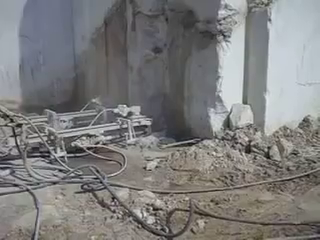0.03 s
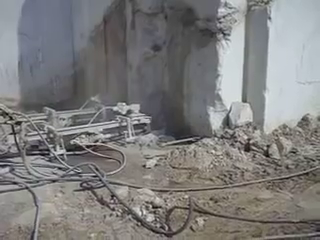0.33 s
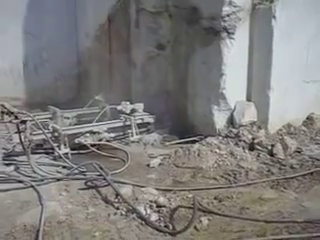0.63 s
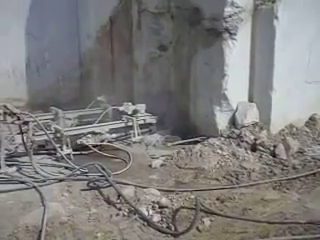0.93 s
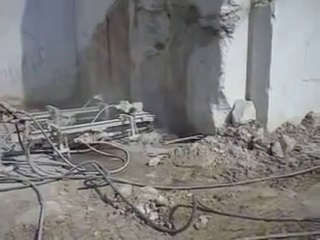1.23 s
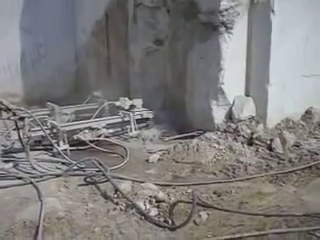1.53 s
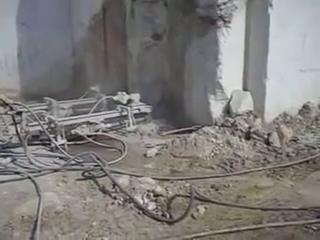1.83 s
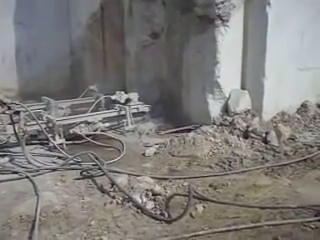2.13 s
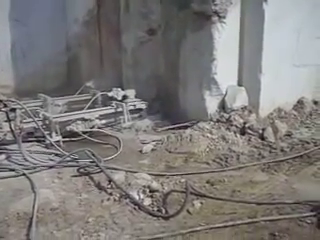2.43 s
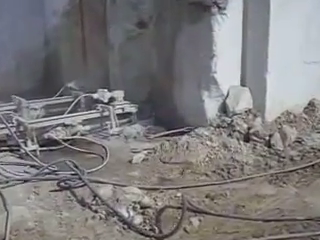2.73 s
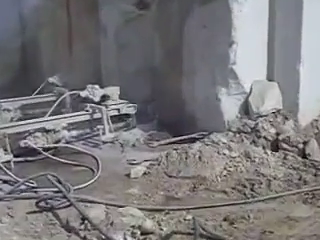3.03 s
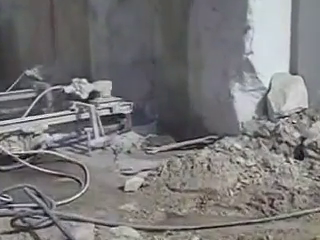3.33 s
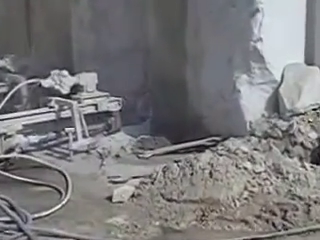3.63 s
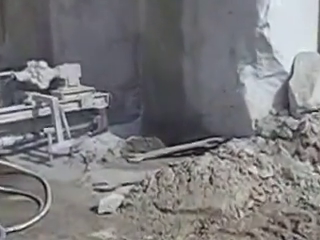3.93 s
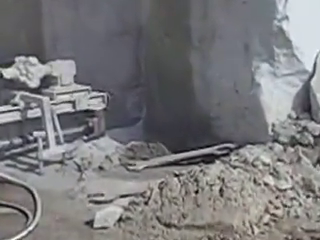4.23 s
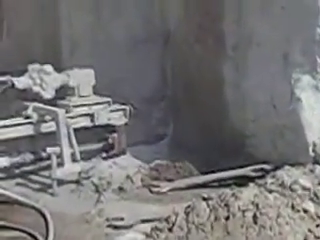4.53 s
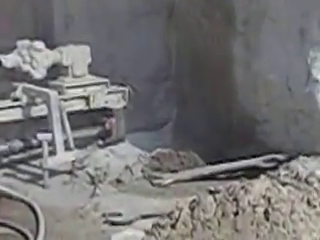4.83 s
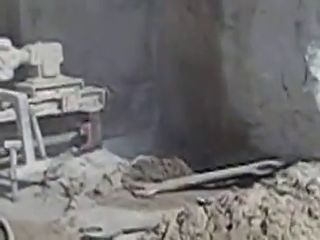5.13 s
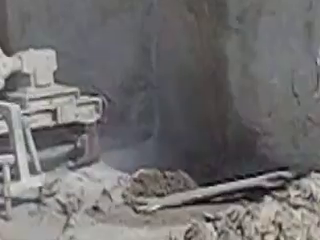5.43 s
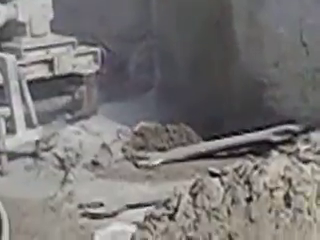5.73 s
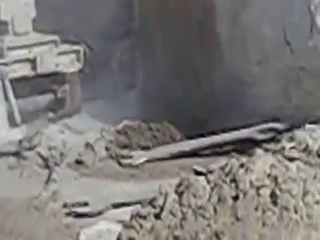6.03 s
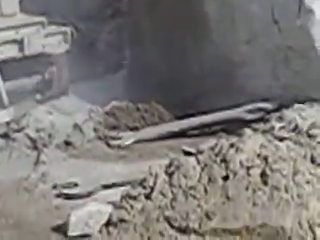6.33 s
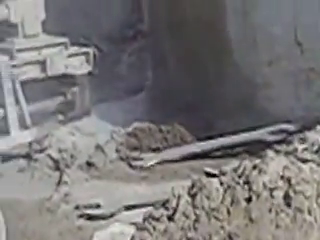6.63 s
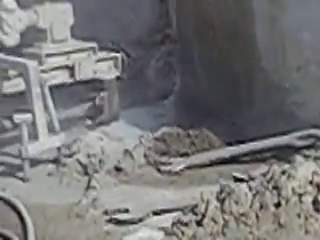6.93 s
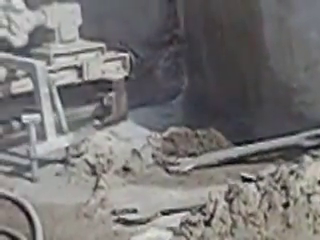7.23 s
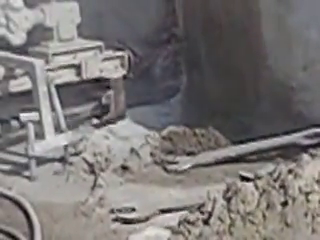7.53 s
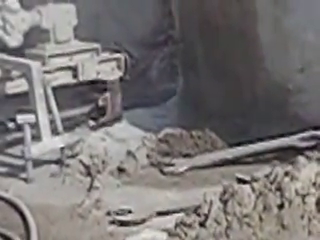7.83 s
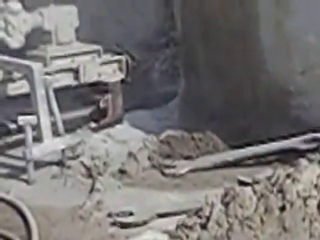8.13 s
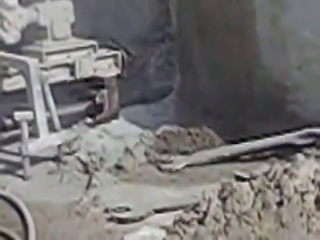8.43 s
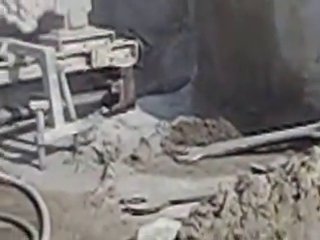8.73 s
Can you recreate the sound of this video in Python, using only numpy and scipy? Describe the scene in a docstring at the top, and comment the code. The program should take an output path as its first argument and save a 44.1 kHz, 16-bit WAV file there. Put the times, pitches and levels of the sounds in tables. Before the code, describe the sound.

A loud, dense roar of two air-powered drills pounding stone in a quarry, one close to the microphone and one farther off. It starts suddenly and never lets up: fast overlapping strokes, rushing air, rattling frames and a high metallic singing from the bits. Sharp exhaust cracks and irregular clanks stand out, with a quick run of ringing blows in the second half. Rock faces echo dully and the pit rumbles underneath.

```python
"""Two rock drills in a quarry

Two pneumatic drills hammer out of step, about 11.6 and 9.7 strokes a second; the sound begins abruptly with
both already in full work. Each stroke throws the piston on the drill steel and dumps puffs of spent air; some
blows bite and clank. Every blow sets off a fading rush of air and grit, so the roar surges as the drills drift
in and out of step. The stone walls echo, the pit rumbles, and the tallest cracks of the exhaust duck a limiter."""
import sys
import numpy as np
from scipy import signal
from scipy.fft import rfft, irfft, next_fast_len
from scipy.io import wavfile

SR = 44100
rng = np.random.default_rng(int(sys.argv[2]) if len(sys.argv) > 2 else 0)


def wrap_up_sound(samples):
    """Save the sound to the file named by the first command line argument, as 16-bit audio."""
    columns = np.atleast_2d(samples).T
    # keep every value between -1 and 1, then stretch to whole-number steps
    tamed = np.clip(columns, -1, 1)
    steps = np.round(tamed * 32767).astype(np.int16)
    wavfile.write(sys.argv[1], SR, steps)


N = 386757
TIME = np.arange(N) / SR
START_S = 0.606


# Stroke counters. Each row: time in seconds, strokes done.
NEAR_STROKE_COUNT = [(0.5195, 0), (0.7765, 3), (1.1213, 7), (1.4706, 11), (1.989, 17), (2.9413, 28),
                     (3.1158, 30), (3.8943, 39), (4.6687, 48), (5.2737, 55), (5.3368, 56), (5.7713, 61),
                     (6.8937, 74), (7.5004, 81), (7.7614, 84), (8.7991, 96)]
FAR_STROKE_COUNT = [(0.5104, 0), (1.2365, 7), (1.3449, 8), (1.9639, 14), (2.0726, 15), (2.2819, 17),
                    (3.2916, 27), (4.0833, 35), (4.5863, 40), (5.2071, 46), (5.3136, 47), (5.3989, 48),
                    (6.0669, 54), (6.4869, 58), (6.7885, 61), (7.0953, 64), (7.7974, 71), (8.2026, 75),
                    (8.8224, 81)]

def stroke_times(counter):
    """A drill cycles each time its counter passes a whole number."""
    times_s, done = np.transpose(counter)
    return np.interp(np.arange(done[-1] + 1), done, times_s)


# Puffs and wall slaps of one stroke. Each row: delay in seconds, ring in Hz, T60 in seconds,
# thud level in dB, spit level in dB.
NEAR_EXHAUST = [(0, 88, 0.06, -11, -20), (.0018, 300, 0.0045, -14, -17.5), (0.0252, 66, 0.071, -18, -22.5),
                (.0247, 261.7, 0.042, -15.5, -34.5), (.0362, 150, .035, -15.5, -45),
                (0.0372, 214, 0.084, -23.5, -31)]
FAR_EXHAUST = [(0, 194, 0.02, -13, -44), (0, 73.6, 0.049, -16, -46), (0.0343, 160, 0.017, -16.5, -51)]
# Rushing air. Each row: frequency in Hz, relative density in dB.
AIR_SPECTRUM = [(1500, -28), (2500, -10.5), (3800, -6), (4200, -5.5), (4700, -3), (5800, -1), (6700, -1),
                (7400, -4.5), (8100, -3), (8500, -6.5), (10200, -9), (10900, -20), (11700, -44.5),
                (12400, -53)]

def exhaust(strokes, puffs, uneven_db, lowpass_hz, spit_s):
    """Each port opens with a pressure step that rings down, and spits a little turbulent air."""
    t = TIME[:SR // 5]
    thuds = spits = 0
    for delay_s, hz, t60_s, thud_db, spit_db in puffs:
        train = clicks(strokes + delay_s, rng.normal(0, uneven_db, len(strokes)))
        thuds -= play(train, from_db(thud_db - 60 * t / t60_s) * np.cos(2 * np.pi * hz * t))
        spits += play(train, from_db(spit_db) * np.exp(-t / spit_s))
    turbulence = noise(AIR_SPECTRUM) + from_db(-5) * noise(FRAME_SPECTRUM)
    return lowpass(thuds, lowpass_hz, order=1) + spits * turbulence


def port_cracks(times_s, peak_db, fall_s, uneven_db):
    """A port snaps open with a needle-sharp pressure spike."""
    train = clicks(times_s, peak_db + uneven_db * rng.standard_normal(len(times_s)))
    needle = lowpass(np.exp(-TIME[:SR // 100] / fall_s), hz=9500, order=8)
    return -play(train, needle / needle.max())


# Each row: start in seconds, peak in dB.
ACCENT_CRACKS = [(1.146, -3), (1.237, -2), (1.494, -5), (1.582, -4), (1.989, -11), (2.513, -5),
                 (2.533, -16), (2.88, -3), (3.227, -4.5), (4.245, -4.5), (4.486, -10), (5.447, -2),
                 (6.172, -7), (6.486, -4), (6.918, -4.5), (7.352, -6), (7.5, 0), (8.651, -16)]

def second_port(times_s, peak_db, fall_s):
    """The near drill's second port cracks on every stroke, now and then far louder."""
    accent_s, accent_db = np.transpose(ACCENT_CRACKS)
    gap_to_accent_s = np.abs(times_s[:, None] - accent_s).min(axis=1)
    ordinary = port_cracks(times_s[gap_to_accent_s > 0.004], peak_db, fall_s, uneven_db=1.2)
    return ordinary + port_cracks(accent_s, accent_db, fall_s, uneven_db=0)


# How firmly each bit bears on the rock. Each row: time in seconds, near drill in dB, far drill in dB.
BIT_PRESSURE = [(0.6, 5.5, -7), (1.5, 0, -0.5), (2.4, 2, -2.5), (2.8, 1.5, -9), (3.8, -1, -1.5),
                (4.8, -0.5, -2.5), (5.7, 2.5, 3), (6.4, 3, -5), (7.3, -4.5, 4), (8.0, -0.5, -4.5),
                (8.77, 0.5, 1.5)]

def strikes(strokes, column, jitter_s, uneven_db):
    """The piston meets the steel just before the exhaust opens, as hard as the bit bears."""
    lead_s = 0.0208
    timing, strength = rng.standard_normal((len(strokes), 2)).T
    bite_db = curve(BIT_PRESSURE, strokes, column)
    return clicks(strokes - lead_s + jitter_s * timing, bite_db + uneven_db * strength)


# Drill frame. Each row: frequency in Hz, relative density in dB.
FRAME_SPECTRUM = [(200, -16), (460, -7), (680, -0.5), (880, -1), (1100, -2.5), (1450, -8.5), (2500, -7.5),
                  (5000, -53)]
# Each row: time in seconds, knock gain in dB.
KNOCK_GAIN = [(0.6, 0.5), (1.4, 2.5), (2.5, 1), (3.4, -4), (4.5, -1), (6.5, 1), (7.4, 0), (8.77, 4)]
# Drill steel. Each row: frequency in Hz, width in Hz, relative level in dB.
SHANK_MODES = [(1817, 17.7, -9.5), (1902, 140, -6.5), (2160, 160, -2)]
ROD_MODES = [(2831, 120, 3), (3406, 120, -1)]

def piston(hits, knock_db, clang_db, fall_s):
    """An ordinary blow knocks the frame, sets the rod pinging and clangs the steel."""
    force = play(hits, burst(rise_s=0.0012, fall_s=fall_s, tail_db=-11.5, tail_s=0.026))
    knock = from_db(knock_db + curve(KNOCK_GAIN)) * noise(FRAME_SPECTRUM)
    ping = from_db(clang_db - 6.5) * ringing(ROD_MODES)
    clang = shake(force * from_db(clang_db), SHANK_MODES + ROD_MODES)
    return force * (knock + ping) + clang


# Each row: start in seconds, then relative levels in dB of frame knock, shank clang, rod ping, bit sizzle.
HARD_BITES = [(1.006, -33, -32, -26, -22), (1.229, -38, -39, -36, -16), (1.533, -32, -40, -24, -17),
              (1.65, -17, -38, -36, -12), (1.968, -24, -31, -24, -26), (2.399, -25, -33, -28, -16),
              (2.483, -41, -40, -31, -18), (3.004, -21, -33, -34, -25), (2.768, -22, -28, -28, -27),
              (3.373, -25, -24, -26, -17), (3.672, -39, -41, -24, -26), (3.768, -32, -30, -30, -24),
              (4.367, -19.5, -40, -40, -22), (4.646, -18, -41, -21, -14), (4.671, -26, -38, -21, -27),
              (4.818, -24, -31, -24, -16), (4.874, -16, -23, -20, -8.5), (5.292, -17, -30, -22, -13),
              (5.598, -35, -19, -22, -15), (5.714, -41, -17.5, -19, -11), (5.824, -31, -19, -19, -18),
              (5.933, -22, -22, -21, -19), (6.048, -23.5, -21, -20, -18), (6.154, -34, -20.5, -28, -21),
              (6.264, -20, -26, -24, -14), (6.36, -15, -30, -18, -8), (6.785, -19, -41, -23, -17),
              (6.977, -41, -31, -22, -22), (7.074, -23, -28, -34, -16), (7.177, -24, -22, -24, -15),
              (7.279, -24, -32, -39, -12), (7.486, -33, -29, -41, -17), (7.911, -32, -42, -34, -29),
              (8.082, -29, -36, -29, -24), (8.49, -27, -23.5, -33, -22), (8.696, -19, -22, -24, -20)]
# Bit and chuck. Each row: frequency in Hz, width in Hz, relative level in dB.
BIT_MODES = [(4400, 52.8, 5.5), (4530, 41, 0), (4640, 19.7, 9.5), (4760, 63, 5), (4990, 38, 8.5),
             (5320, 78, 5.5), (5130, 180, -23), (6500, 67, -24), (8130, 110, -29)]

def clanks():
    """A hard bite knocks the frame, rings the shank and the long rod, and crushes stone under the bit."""
    start_s, knock_db, clang_db, ping_db, sizzle_db = np.transpose(HARD_BITES)
    knock = burst(rise_s=0.0037, fall_s=0.0028, tail_db=-13.5, tail_s=0.037)
    clang = burst(rise_s=0.0023, fall_s=0.0049, tail_db=-21, tail_s=0.0099)
    ping = burst(rise_s=0.0022, fall_s=0.004, tail_db=0, tail_s=0.012)
    sizzle = burst(rise_s=0.0024, fall_s=0.025, tail_db=-18, tail_s=0.055)
    shank = play(clicks(start_s, clang_db + 0.29), clang) * ringing(SHANK_MODES)
    rod = play(clicks(start_s, ping_db), ping) * ringing(ROD_MODES)
    frame = play(clicks(start_s + 0.0021, knock_db - 4.5), knock) * noise(FRAME_SPECTRUM)
    crushing = ringing(BIT_MODES) + from_db(0.5) * noise(AIR_SPECTRUM)
    bit = play(clicks(start_s, sizzle_db - 9), sizzle) * crushing
    return frame + shank + rod + bit


def metal_tick(start_s, peak_db, ring_s):
    """A single sharp contact rings a few short modes."""
    t = TIME[:SR // 20]
    ring = sum(np.sin(2 * np.pi * hz * t) for hz in (4540, 5350, 6140, 6200)) * np.exp(-t / ring_s)
    return play(clicks(np.array([start_s]), peak_db), ring / np.abs(ring).max())


def spray_power(hits, level_db, rise_s, fall_s):
    """Power of the fading rush of air and grit that each blow sets off."""
    envelope = from_db(level_db) * burst(rise_s, fall_s, tail_db=-11, tail_s=0.099)
    return play(hits ** 2, envelope ** 2).clip(0)


# Steady flushing air. Each row: time in seconds, relative level in dB.
FLUSH_LEVEL = [(0.6, -23), (1.3, -26.5), (1.9, -22.5), (2.4, -25), (2.6, -28), (3.3, -23.5), (3.6, -23.5),
               (4.5, -22), (5.6, -22), (6.5, -24), (7.3, -22.5), (8.77, -22.5)]
# Singing of the bits. Each row: time in seconds, level in dB relative to the spray.
SINGING_LEVEL = [(0.6, -2), (1.5, -1.5), (2.3, -5), (4.0, -6.5), (5.0, -6.5), (6.4, -5.5), (7.3, -5),
                 (8.77, -5)]

def roar(near_power, far_power):
    """Air and grit surge with the blows of both drills, while the rigs rattle and the bits sing."""
    flush_db = curve(FLUSH_LEVEL)
    gusts = flutter(rate_hz=47)
    surge = np.sqrt(near_power + far_power)
    air = np.hypot(surge, from_db(flush_db - 1)) * from_db(0.78 * gusts + 0.55 * flutter(rate_hz=520))
    singing = surge * from_db(curve(SINGING_LEVEL) + 2.3 * gusts + 0.92 * flutter(rate_hz=19))
    rattle = np.sqrt(near_power + from_db(4) * far_power + from_db(flush_db - 14.5) ** 2)
    rattle *= from_db(-4.5 + 1.2 * gusts + 0.74 * flutter(rate_hz=180))
    steel = from_db(-14) * shake(rattle, SHANK_MODES) + from_db(-14.5) * shake(rattle, ROD_MODES)
    hiss = air * noise(AIR_SPECTRUM)
    bits = shake(singing, BIT_MODES)
    frames = from_db(-3.5) * rattle * noise(FRAME_SPECTRUM)
    return hiss + bits + frames + steel


def wall_echoes(x, t60_s, lowpass_hz, count=60):
    """The rock faces throw back scattered, dull echoes."""
    delays_s = rng.uniform(0.012, 0.3, count)
    echoes = np.zeros(SR // 2)
    echoes[(delays_s * SR).astype(int)] = from_db(-60 * delays_s / t60_s) * rng.choice([-1, 1], count)
    return lowpass(play(x, echoes / np.linalg.norm(echoes)), lowpass_hz)


# Rock basin. Each row: frequency in Hz, relative density in dB.
RUMBLE_SPECTRUM = [(12, -18), (30, 4.5), (65, -2.5), (95, -22), (120, -2), (150, -4), (200, -24),
                   (400, -38.5)]
BOOM_SPECTRUM = [(120, -24), (185, 1), (215, -8.5), (265, -3), (310, -2), (370, -41), (480, -11.5),
                 (700, -14), (1200, -53)]
# Each row: time in seconds, rumble gain in dB.
RUMBLE_GAIN = [(0.6, -2.5), (1.7, -1), (2.6, -4.5), (4.2, -3.5), (4.8, -3), (6.1, -1.5), (6.7, 0),
               (7.6, -1), (8.77, -0.5)]

def pit(rumble_db, boom_db, thump_s, thump_db):
    """The rock basin rumbles and booms under the hammering, once with a heavy thump."""
    thump_shape = burst(rise_s=0.004, fall_s=0.007, tail_db=-27, tail_s=0.028)
    thump = play(clicks(np.array([thump_s]), thump_db), thump_shape)
    rumble = from_db(rumble_db + curve(RUMBLE_GAIN) + 2.14 * flutter(rate_hz=12)) * noise(RUMBLE_SPECTRUM)
    boom = (from_db(boom_db + 3.5 * flutter(rate_hz=30)) + thump) * noise(BOOM_SPECTRUM)
    return rumble + boom


def shake(force, modes):
    """A rough contact drives parallel resonances; the output rms follows the force."""
    contact = force * rng.standard_normal(N) + 1e-18
    out = power = 0
    for hz, width_hz, level_db in modes:
        radius, gain = np.exp(-np.pi * width_hz / SR), from_db(level_db)
        scale = (1 - radius ** 2) / 2
        poles = [1, -2 * radius * np.cos(2 * np.pi * hz / SR), radius ** 2]
        out += gain * signal.lfilter([scale, 0, -scale], poles, contact)
        power += gain ** 2 * scale
    return out / np.sqrt(power)


def ringing(modes):
    """Tones of loaded steel, each wavering at random in pitch; rms 1."""
    out = 0
    for hz, width_hz, level_db in modes:
        pitch_hz = hz + width_hz / 2 * flutter(rate_hz=40)
        out += from_db(level_db) * np.sin(2 * np.pi * np.cumsum(pitch_hz) / SR)
    return rms_one(out)


def noise(spectrum):
    """Noise of a given colour; rms 1."""
    size = next_fast_len(N)
    hz, level_db = np.transpose(spectrum)
    bins_hz = np.arange(size // 2 + 1) * SR / size
    gain = from_db(np.interp(np.log(bins_hz + 1), np.log(hz), level_db))
    return rms_one(irfft(rfft(rng.standard_normal(size)) * gain, size)[:N])


def flutter(rate_hz):
    """Random wander below the given rate; rms 1."""
    return rms_one(lowpass(rng.standard_normal(N + SR), rate_hz)[SR:])


def burst(rise_s, fall_s, tail_db, tail_s):
    """Envelope of a blow: a quick swell and fall, then a longer tail; peak 1."""
    t = TIME[:SR // 4]
    rise = 1 - np.exp(-(t / rise_s) ** 2)
    shape = rise * (np.exp(-t / fall_s) + from_db(tail_db) * np.exp(-t / tail_s))
    return shape / shape.max()


def clicks(times_s, level_db):
    """One impulse at each time."""
    train = np.zeros(N)
    samples = np.clip((times_s * SR).astype(int), 0, N - 1)
    np.add.at(train, samples, from_db(level_db) * (times_s < N / SR))
    return train


def play(train, shape):
    """Every impulse sets off the same shape."""
    return signal.oaconvolve(train, shape)[:N]


def curve(rows, times_s=TIME, column=1):
    """One column of a table, interpolated over time."""
    columns = np.transpose(rows)
    return np.interp(times_s, columns[0], columns[column])


def lowpass(x, hz, order=2):
    return signal.sosfilt(signal.butter(order, hz, fs=SR, output="sos"), x)


def from_db(db):
    return 10 ** (np.asarray(db) / 20)


def rms_one(x):
    return x / np.sqrt(np.mean(x ** 2) + 1e-20)


def limiter(x, threshold_db=-7, max_duck_db=6, attack_s=0.0004, recovery_db_per_s=43):
    """Every tall pressure spike ducks the whole roar, which then swells back."""
    over_db = np.clip(20 * np.log10(np.abs(x) + 1e-9) - threshold_db, 0, max_duck_db)
    recovery_db = recovery_db_per_s * TIME
    duck_db = np.maximum.accumulate(over_db + recovery_db, axis=-1) - recovery_db
    pole = np.exp(-1 / (attack_s * SR))
    return x * from_db(-signal.lfilter([1 - pole], [1, -pole], duck_db))


def scene():
    """Both drills, their echoes and the low rumble of the pit."""
    near, far = stroke_times(NEAR_STROKE_COUNT), stroke_times(FAR_STROKE_COUNT)
    thuds = exhaust(near, NEAR_EXHAUST, uneven_db=2.2, lowpass_hz=416, spit_s=0.00059)
    thuds += exhaust(far, FAR_EXHAUST, uneven_db=1.7, lowpass_hz=390, spit_s=0.00063)
    cracks = port_cracks(near + 0.0003, peak_db=-13, fall_s=0.000067, uneven_db=1.9)
    cracks += second_port(near + 0.0251, peak_db=-10.5, fall_s=0.00005)
    near_hits = strikes(near, column=1, jitter_s=0.00063, uneven_db=0)
    far_hits = strikes(far, column=2, jitter_s=0.0012, uneven_db=3.45)
    blows = piston(near_hits, knock_db=-27.5, clang_db=-30, fall_s=0.0015)
    blows += piston(far_hits, knock_db=-44.5, clang_db=-27, fall_s=0.0057)
    blows += clanks() + metal_tick(start_s=5.7045, peak_db=3.5, ring_s=0.0045)
    near_power = spray_power(near_hits, level_db=-28.5, rise_s=0.0033, fall_s=0.15)
    far_power = spray_power(far_hits, level_db=-26.5, rise_s=0.0062, fall_s=0.064)
    rush = roar(near_power, far_power)
    echoes = from_db(-7) * wall_echoes(thuds, t60_s=0.26, lowpass_hz=1420)
    echoes += from_db(-8.5) * wall_echoes(blows, t60_s=0.38, lowpass_hz=5040)
    rumble = pit(rumble_db=-28, boom_db=-35, thump_s=0.67, thump_db=-12)
    return (thuds + cracks + blows + rush + echoes + rumble)[None] * (TIME >= START_S)


def record(dry):
    """The deepest bass is thinned, a limiter ducks under the spikes, peaks are rounded, the top is cut."""
    highpass_hz, cutoff_hz, ceiling = 14, 12100, 1.05
    thinned = signal.sosfilt(signal.butter(1, highpass_hz, "high", fs=SR, output="sos"), dry)
    rounded = ceiling * np.tanh(limiter(from_db(1.3) * thinned) / ceiling)
    return signal.sosfilt(signal.ellip(10, 0.1, 90, cutoff_hz, fs=SR, output="sos"), rounded)


dry = scene()
out = record(dry)
wrap_up_sound(out)
```